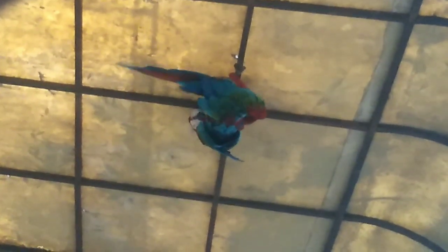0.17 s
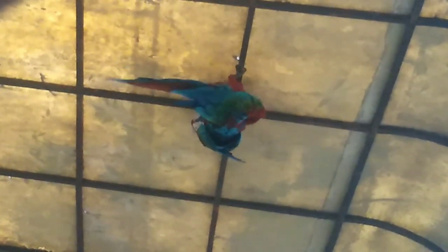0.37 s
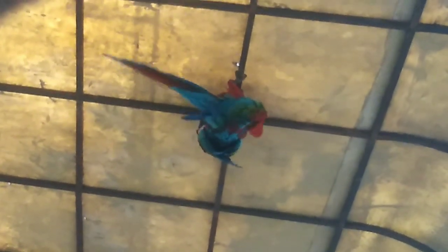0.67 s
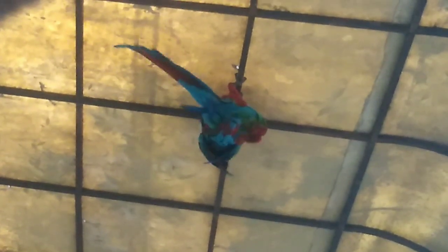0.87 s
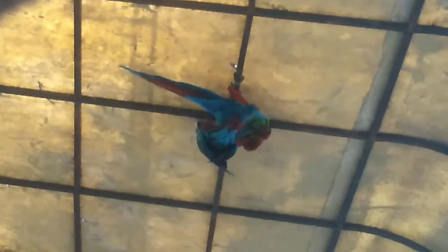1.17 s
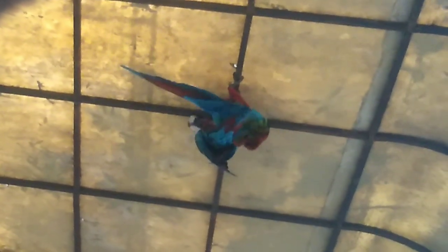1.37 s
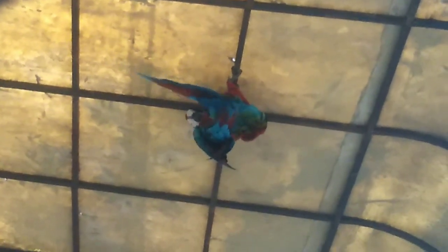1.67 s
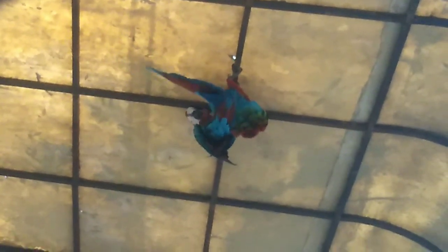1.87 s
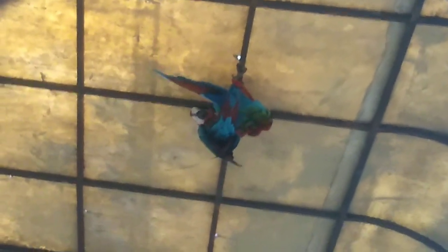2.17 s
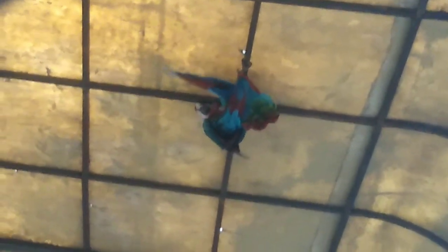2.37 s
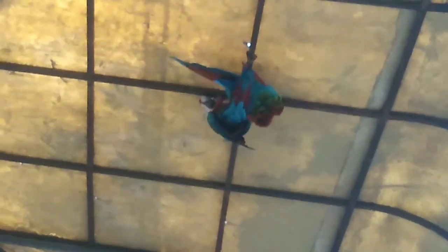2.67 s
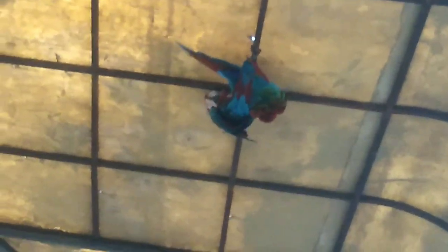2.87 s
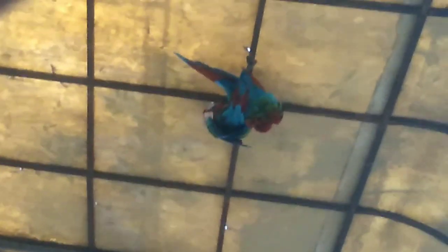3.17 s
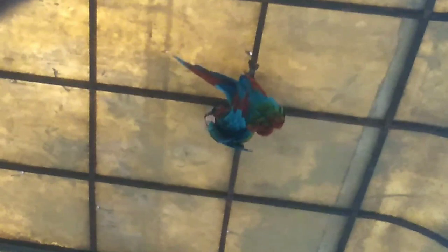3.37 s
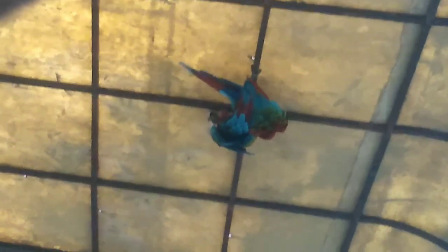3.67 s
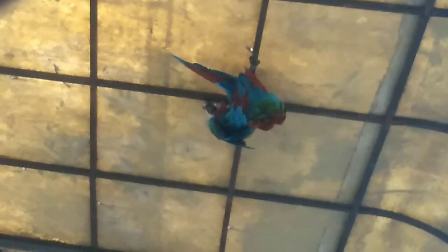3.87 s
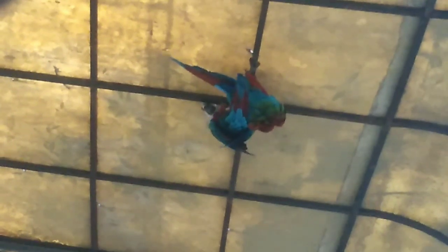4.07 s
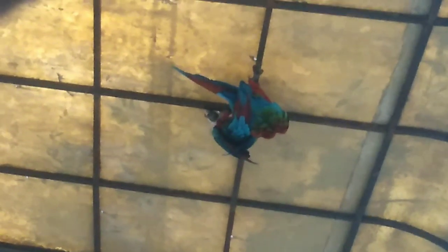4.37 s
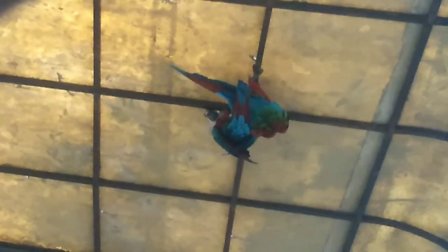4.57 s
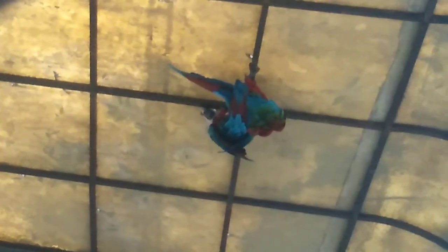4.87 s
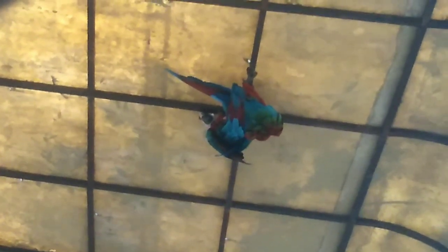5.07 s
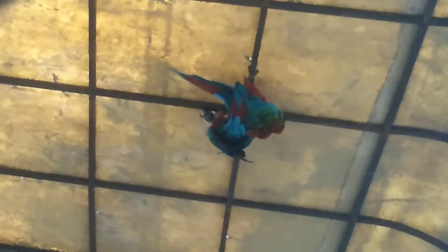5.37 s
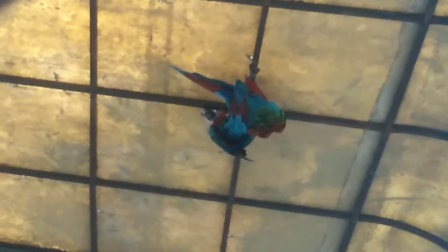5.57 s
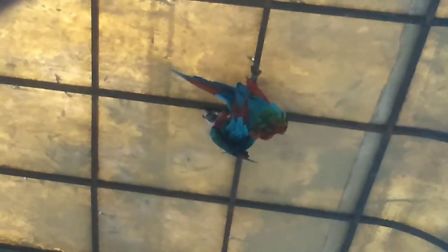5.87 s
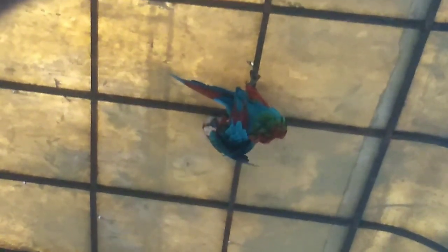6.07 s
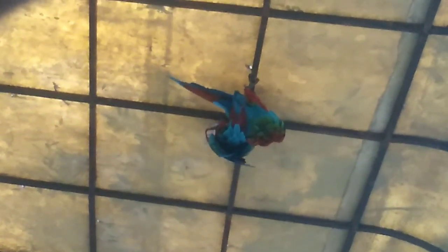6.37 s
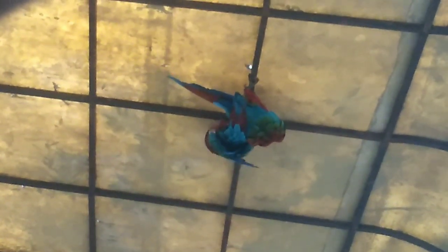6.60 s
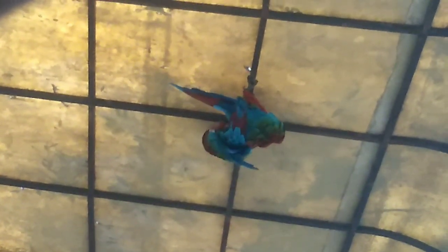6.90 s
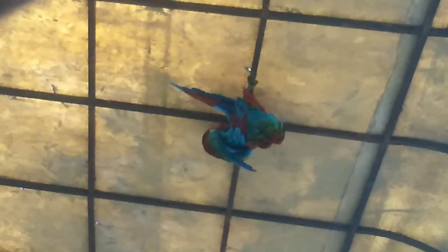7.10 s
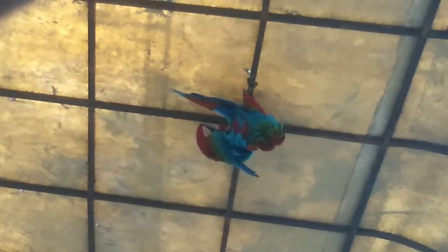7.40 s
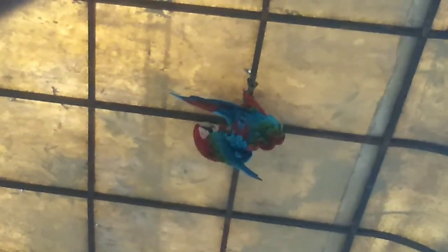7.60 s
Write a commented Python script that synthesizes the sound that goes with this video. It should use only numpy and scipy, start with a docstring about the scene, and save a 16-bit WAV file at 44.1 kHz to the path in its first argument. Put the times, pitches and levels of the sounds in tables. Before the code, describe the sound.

A parrot chatters in quick hoarse bursts while another whistles and rasps nearby; far birds caw and squawk, building to a noisy end.

```python
"""Parrots in an aviary

A near bird chatters in bouts of short buzzy notes, a near macaw whistles, and rasps sound; a claw ticks on the bars.
Far birds squawk, caw and whistle in echoes, their treble to the left, over rumble, a hiss at the left and faint tones.
Voices are pulses and gated noise through throat resonances; whistles are shaken sines; the air is shaped noise."""
import sys
import numpy as np
from scipy import signal
from scipy.fft import rfft, irfft, next_fast_len
from scipy.io import wavfile
from scipy.ndimage import uniform_filter1d, map_coordinates

SR = 44100
rng = np.random.default_rng(int(sys.argv[2]) if len(sys.argv) > 2 else 0)


def unload_wav(signal):
    """Save mono or channel-first audio to the path in sys.argv[1] as 16-bit WAV at rate SR, clipped to [-1, 1]."""
    wavfile.write(
        sys.argv[1],
        SR,
        np.round(np.clip(np.atleast_2d(signal).T, -1, 1) * 32767).astype(np.int16),
    )


N = 341334
T = np.arange(N) / SR
FAR_RISE_S, FAR_SAG_DB = .08, 1  # swell of a far call, and its loss from start to end


def amp(db):
    """Decibels to amplitude."""
    return 10 ** (np.asarray(db) / 20)


def unit(x):
    """Scale to an rms of 1."""
    return x / np.sqrt(np.mean(x ** 2) + 1e-20)


def along(points, hz):
    """Read (Hz, value) points on a log frequency axis."""
    f, v = np.transpose(points)
    return np.interp(np.log(hz + 1), np.log(f + 1), v)


def curves(rows):
    """One value per sample for each column after the time."""
    s, *cols = np.transpose(rows)
    return [np.interp(T, s, c) for c in cols]


def wobble(rate):
    """A smooth random curve, rate knots a second."""
    return map_coordinates(rng.standard_normal(int(N * rate / SR) + 4), [T * rate])


def filtered(x, response):
    """Multiply the spectrum of x by a response of frequency."""
    m = next_fast_len(N + SR // 2)
    return irfft(rfft(x, m) * response(np.fft.rfftfreq(m, 1 / SR)), m)[..., :N]


def calls(rows, rise_s, fall_s, sag_db):
    """Rise, sagging hold and fall of each call; columns after the level are averaged by the gain of the calls."""
    gain = np.zeros(N)
    cols = 1e-9 * np.outer(rows[0][3:], np.ones(N))  # the first row's values hold during silence
    for s, length, db, *rest in rows:
        edges = np.clip(np.minimum((T - s) / rise_s, (s + length - T) / fall_s), 0, 1)
        shape = edges * amp(db - sag_db * np.clip((T - s) / length, 0, 1))
        gain += shape
        cols += np.outer(rest, shape)
    return gain, cols / (gain + 1e-9)


def throat(source, shapes, opening):
    """Cross-fade between the shut and the open set of resonances; each set acts twice, so the valleys stay dark."""
    def ring(modes):
        def response(f):
            total = 0
            for k, (c, w, db) in enumerate(modes):
                band = 1j * f * w / (c * c - f * f + 1j * f * w)
                total = total + (-1) ** k * amp(db) * band
            return total ** 2
        return response

    shut, wide = [unit(filtered(source, ring(modes))) for modes in shapes]
    turn = np.clip(opening, 0, 1) * np.pi / 2
    return np.cos(turn) * shut + np.sin(turn) * wide


def syrinx(hz, rough, jitter, sharp):
    """Membrane pulses at the pitch, mixed with noise let through once a cycle; a rough voice trembles more."""
    share = np.clip(rough, 0, 1)
    waver_db = 4  # each partial wavers on its own
    phase = 2 * np.pi * np.cumsum(hz * (1 + jitter * (0.303 + share) * wobble(120))) / SR
    pulses = np.zeros(N)
    for k in range(1, 15):
        pulses += amp(waver_db * wobble(70)) * np.cos(k * phase) / (1 + (k / 9) ** 4)
    puffs = np.exp(sharp * np.cos(phase)) * rng.standard_normal(N)
    return np.sqrt(1 - share) * unit(pulses) + np.sqrt(share) * unit(puffs)


def tail():
    """A pair of echo tails made of decaying noise; each frequency dies at its own speed."""
    # Decay of the aviary. Each row: frequency in Hz, time to fall by 60 dB in seconds.
    decay = [(300, 0.55), (3000, 0.91), (10000, 0.26)]
    hz, t, z = signal.stft(rng.standard_normal((2, SR // 2)), SR, nperseg=256)
    fading = z * amp(-60 * t / along(decay, hz)[:, None])
    pair = signal.istft(fading, SR, nperseg=256)[1]
    return pair / np.linalg.norm(pair[0])


def rush(spectrum, patchy_db):
    """Stereo noise of rms 1, with random patches of gain, coloured by a spectrum and placed band by band."""
    # Stereo width. Each row: frequency in Hz, left-right likeness from 0 to 1.
    likeness = [(60, 1), (290, 0.8), (630, 0.82), (1370, 0.29), (8000, 1)]
    # Stereo balance. Each row: frequency in Hz, left over right in dB.
    balance = [(60, -0.5), (900, -2.5), (2300, 3), (4250, 17.5), (11000, -0.5)]

    def mid_side(hz):
        turn = np.arccos(np.clip(along(likeness, hz), -1, 1)) / 2
        return amp(along(spectrum, hz)) * np.array([np.cos(turn), np.sin(turn)])

    z = signal.stft(rng.standard_normal((2, N)), nperseg=512)[2]
    across_bands = uniform_filter1d(rng.standard_normal(z.shape[1:]), 5, 0)
    patches = unit(uniform_filter1d(across_bands, 14, 1))
    pair = signal.istft(z * amp(patchy_db * patches), nperseg=512)[1][:, :N]
    mid, side = filtered(pair, mid_side)
    left_right = np.array([mid + side, mid - side])
    return unit(filtered(left_right, lambda hz: amp(np.outer([.5, -.5], along(balance, hz)))))


def moving_air():
    """Rumble of fans and traffic under a wash of air: two shaped noises at slowly changing levels."""
    # Mix of the air. Each row: time in seconds, rumble level in dB, wash level in dB.
    air_levels = [(0, -28, -36.5), (1.5, -31, -38.5), (7.74, -32.5, -39)]
    # Colour of the rumble. Each row: frequency in Hz, relative density in dB per Hz.
    rumble_colour = [(25, -49), (48, -21.5), (75, -8), (140, -4.5), (289, -19.5), (520, -30), (880, -120)]
    # Colour of the wash. Each row: frequency in Hz, relative density in dB per Hz.
    wash_colour = [(150, -25), (250, -7.5), (400, -4), (1310, -7.5), (2160, -12), (3370, -21), (5660, -17),
                   (10800, -37)]
    rumble_db, wash_db = curves(air_levels)
    rumble = amp(rumble_db) * rush(rumble_colour, patchy_db=0.75)
    return rumble + amp(wash_db) * rush(wash_colour, patchy_db=2.0)


def motor():
    """A motor that swells, then fades: a wandering low tone and its octave."""
    # Course of the motor. Each row: time in seconds, level in dB before a slight random waver.
    motor_levels = [(0, -30), (.6, -26), (.85, -30), (1.4, -39)]
    db, = curves(motor_levels)
    phase = 2 * np.pi * np.cumsum(101.5 * (1 + .008 * wobble(3.7))) / SR
    return amp(db + 0.47 * wobble(1.7)) * (np.sin(phase) + amp(-4.0) * np.sin(2 * phase))


def passing_hum():
    """A low hum that passes: a steady sine with a wavering level."""
    hum_hz = 379
    # The hum. Each row: start in seconds, length in seconds, level in dB before the sag and waver.
    hum_rows = [(1.4, 0.645, -41)]
    gain = calls(hum_rows, rise_s=0.081, fall_s=0.086, sag_db=1.8)[0]
    return gain * amp(2.05 * wobble(12.5)) * np.sin(2 * np.pi * hum_hz * T)


def high_tone():
    """A faint flickering high tone at the right: a steady sine of random level."""
    tone_hz = 14000
    tone = amp(-66 + 5 * wobble(16)) * np.sin(2 * np.pi * tone_hz * T)
    return tone * [[0], [1]]


def whistles(strands, dull_db):
    """Tones with three overtones; roughness shakes pitch and strength until the line frays."""
    # Overtone colour. Each row: frequency in Hz, level under the ground tone in dB before the shifts below.
    overtone_colour = [(2600, -15), (3300, -10), (4400, -11), (5000, -20), (6600, -16), (8500, -30),
                       (9050, -10), (9600, -40)]
    order_db, torn_db = 4, 9  # loss from each overtone to the next; overtone gain at full roughness
    out = np.zeros(N)
    shake, flutter = wobble(260), wobble(220)
    flicker_db = [4 * wobble(45) for k in range(3)]  # each overtone comes and goes
    breath = unit(wobble(500))  # turbulence that smears a rough line into a band
    for s, length, first_hz, last_hz, arch_hz, db, rough in strands:
        span = slice(round(s * SR), round((s + length) * SR))
        u = (T[span] - s) / length
        hz = first_hz + (last_hz - first_hz) * u + arch_hz * np.sin(np.pi * u)
        phase = 2 * np.pi * np.cumsum(hz * (1 + 0.0737 * rough * shake[span])) / SR
        tone = np.sin(phase)
        for k in range(2, 5):
            tilt_db = torn_db * rough ** 2 - order_db * (k - 2.5) - dull_db
            overtone_db = along(overtone_colour, k * hz) + tilt_db + flicker_db[k - 2][span]
            tone = tone + amp(overtone_db) * np.sin(k * phase)
        smear = 1 - rough ** 3 + rough ** 2 * breath[span]
        beat = unit(amp(6 * rough * np.tanh(flutter[span])) * smear)
        out[span] += amp(db) * beat * np.abs(np.sin(np.pi * u)) ** 0.3 * tone
    return out


def far_squawks():
    """Hoarse calls: pitch and strength lurch together as the voice cracks, while the beak wavers on its own."""
    # Squawks. Each row: start in seconds, length in seconds, level in dB, beak opening from 0 to 1,
    # pulse rate in Hz; level, opening and rate are centres for random movement.
    squawk_rows = [(4.18, .22, -31.5, .95, 240), (5.42, 0.45, -39, 0.3, 197.6), (6.89, .2, -26.5, .6, 190),
                   (7.03, .35, -26.5, .5, 170), (7.58, .2, -31.5, 0.4, 229)]
    # Throat, beak shut then open. Each row: resonance in Hz, width in Hz, gain in dB, all for one pass of two.
    distant_throat = [
        [(800, 500, -4), (1350, 350, 0), (1650, 300, 0), (4800, 3000, -7)],
        [(1200, 600, -3), (2550, 300, 0), (3100, 400, 0), (5000, 2500, -6.5)],
    ]
    gain, (beak, hz) = calls(squawk_rows, FAR_RISE_S, fall_s=.02, sag_db=FAR_SAG_DB)
    breaks = wobble(22)
    source = syrinx(hz * amp(.8 * breaks), rough=.33, jitter=.03, sharp=1)
    return gain * amp(1.5 * breaks) * throat(source, distant_throat, beak + .25 * wobble(20))


def far_caws():
    """Deep caws of a larger far bird: slow rough pulses through a low throat."""
    # Caws. Each row: start in seconds, length in seconds, level in dB, pulse rate in Hz, before random wander.
    caw_rows = [(2.35, 0.53, -36.5, 118.5), (4.12, 0.43, -40, 129.8), (7.02, 0.37, -27, 140.1),
                (7.46, 0.16, -26, 138.8)]
    # Throat, beak shut then open. Each row: resonance in Hz, width in Hz, gain in dB, all for one pass of two.
    deep_throat = [
        [(742, 370, 1), (1043, 420, 4)],
        [(877, 570, 3), (1250, 2260, -0.5)],
    ]
    gain, (hz,) = calls(caw_rows, FAR_RISE_S, FAR_RISE_S / 2, FAR_SAG_DB)
    source = syrinx(hz * amp(.5 * wobble(22)), rough=.55, jitter=.04, sharp=.7)
    return gain * amp(2 * wobble(25)) * throat(source, deep_throat, .5 + .6 * wobble(12))


def far_birds():
    """Far calls reach the right channel a little late, half lost in echoes; their treble leans left."""
    # Far whistles. Each row: start in seconds, length in seconds, first pitch in Hz, last pitch in Hz,
    # arch in Hz, level in dB, roughness from 0 to 1.
    far_strands = [ (1.235, 0.054, 1823, 1745, 21, -32, 0.18), (1.24, 0.081, 2366, 2394, 24, -43.5, 0.18),
                   (1.43, 0.18, 1750, 1683, 221.5, -39, 0.73), (4.19, .1, 2796, 3370, -6, -39.5, .35),
                   (4.235, 0.069, 2550, 2690, 43, -34, .4), (4.3, 0.14, 780, 727, -1.5, -36, .3),
                   (7.03, 0.13, 2530, 2450, 27.5, -29, 0.66), (7.11, .13, 2824, 2910, 66, -39, 0.41),
                   (7.105, 0.11, 1550, 1471, -6, -19, 0.6)]
    # Balance of the far birds. Each row: frequency in Hz, left over right in dB.
    leaning = [(1300, -4), (2300, 11), (8000, 14)]
    lag_s = 3.6e-4
    voices = far_squawks() + far_caws() + whistles(far_strands, dull_db=7)
    direct = filtered(voices, lambda f: np.array([1 + 0 * f, np.exp(-2j * np.pi * f * lag_s)]))
    echo = signal.fftconvolve(voices[None], tail(), axes=1)[:, :N]
    pair = direct + amp(-6) * echo
    return filtered(pair, lambda f: amp(np.outer([.5, -.5], along(leaning, f))))


def tick():
    """A claw on the bars: a dry click of noise that dies within milliseconds."""
    # The click: start in seconds, level at the start in dB.
    click = (2.925, -28)
    s, db = click
    return amp(db - 60 * np.abs(T - s) / 0.018) * (T > s) * rng.standard_normal(N)


def rasps():
    """Irregular slow slaps of the membranes gate a turbulent stream."""
    # Rasps, from a faint long hoarse cry to loud short ones. Each row: start in seconds, length in seconds,
    # level in dB, beak opening from 0 to 1; level and opening are centres for random movement.
    rasp_rows = [(.93, 0.4, -40, 0.46), (3.985, 0.048, -22, 0.1), (4.555, 0.038, -28.5, 0.3),
                 (6.292, 0.21, -27, 0.62), (6.84, 0.049, -23.5, 0), (7.15, 0.19, -28, 0.5),
                 (7.536, 0.12, -18, 0.57)]
    # Throat, beak shut then open. Each row: resonance in Hz, width in Hz, gain in dB, all for one pass of two.
    large_throat = [
        [(1310, 760, 6.5), (1576, 810, 11), (2310, 1740, 4), (4770, 1700, 0), (6800, 2600, -7)],
        [(1620, 1080, -6.5), (2435, 1400, -1.5), (4440, 680, 2), (6530, 1540, -4.5), (8580, 2800, -6.5)],
    ]
    gain, (beak,) = calls(rasp_rows, rise_s=.014, fall_s=.028, sag_db=4)
    source = syrinx(130 * amp(2.4 * wobble(25)), rough=0.92, jitter=0.098, sharp=0.11)
    ragged = gain * amp(wobble(60))
    return ragged * throat(source, large_throat, beak + .2 * wobble(30))  # the beak is never still


def macaw_whistles():
    """The near macaw whistles in short strands, each a gliding tone."""
    # Near whistles. Each row: start in seconds, length in seconds, first pitch in Hz, last pitch in Hz,
    # arch in Hz, level in dB, roughness from 0 to 1.
    near_strands = [ (3.805, 0.084, 2050, 1940, 196, -30, 0.5), (3.857, 0.038, 1608, 1637, 0, -23, 0.43),
                    (3.897, 0.061, 1672, 1682, 12.5, -15.5, 0.04),
                    (3.958, 0.052, 2100, 1890, 279, -22, 0.44), (4.374, 0.047, 2110, 1900, 230, -27.5, .3),
                    (4.407, 0.11, 1507, 1622, 28, -26.5, 0.14), (4.503, .08, 2024, 1853, 228, -24.5, 0.49),
                    (6.287, 0.19, 1675, 1187, 97.5, -30.5, 0.5), (6.356, .11, 2150, 2510, 11, -27, 0.59),
                    (6.758, .12, 1685, 1237, 11, -26, 0.32), (7.195, .097, 1770, 1350, 60, -18, .58),
                    (7.439, .09, 2985, 3005, 35, -21, .17), (7.518, .045, 2800, 2150, -30, -14, .6),
                    (7.49, .06, 1690, 1560, 20, -29, .5), (7.542, .07, 1540, 1420, -40, -19.5, .7)]
    return whistles(near_strands, dull_db=0.5)


def chatter():
    """Notes swell quickly and fade, pitch arching then sagging; a bout drifts in strength and grows hoarser."""
    # Notes, one list a bout. Each row: start in seconds, pitch in Hz before arch and jitter.
    bout_notes = [
        [(-.015, 507), (.124, 540.3), (.288, 544), (.425, 555.5), (.556, 532.4), (.682, 544.6), (.812, 503),
         (.944, 529), (1.075, 550), (1.202, 557)],
        [(1.984, 495.4), (2.143, 498.7), (2.286, 486), (2.433, 496), (2.581, 496.6)],
        [(3.297, 517.4), (3.455, 554), (3.6, 526), (3.728, 538), (3.853, 532), (3.99, 534), (4.118, 526)],
        [(4.995, 492), (5.159, 502.4), (5.308, 496), (5.456, 496.4)],
        [(6.613, 517), (6.777, 542), (6.919, 548.6)],
        [(7.05, 545), (7.178, 548), (7.305, 545), (7.442, 553)],
    ]
    # Bouts. Each row: note length in seconds, first note in dB, last note in dB,
    # first roughness from 0 to 1, beak opening from 0 to 1; the last two before random scatter.
    bout_settings = [(.046, -29.5, -29, .36, 0.75), (.055, -29, -26.5, 0.31, 0.57),
                     (0.0497, -27.5, -29, .2, 0.47), (.058, -28, -25, 0.26, 0.67),
                     (0.064, -27.5, -24, 0.45, 0.51), (0.045, -27, -28, 0.25, 0.56)]
    # Throat, beak shut then open. Each row: resonance in Hz, width in Hz, gain in dB, all for one pass of two.
    small_throat = [
        [(1602, 480, -7), (2046, 140, -1.5), (2446, 196, -3.5), (4360, 640, -7), (6500, 3100, -8.5)],
        [(1140, 1080, -3), (2736, 610, 4.5), (3310, 620, 3.5), (4346, 780, 2.5), (7800, 1900, -2.5)],
    ]
    hoarsens, cracks = .03, .12  # roughness gained from note to note, and either side of a note's middle
    rough_scatter, beak_scatter = .08, .08
    sag = .035  # share of the pitch lost towards the end of a note
    gain, arch, controls = np.zeros(N), np.ones(N), []
    for notes, (length, first_db, last_db, rough, beak) in zip(bout_notes, bout_settings):
        levels_db = np.linspace(first_db, last_db, len(notes))
        for k, ((s, hz), db) in enumerate(zip(notes, levels_db)):
            span = slice(max(round(s * SR), 0), round((s + length) * SR))
            u = np.clip((T[span] - s) / length, 0, 1)
            gain[span] += amp(db) * np.abs(np.sin(np.pi * u ** 0.9)) ** 0.75
            arch[span] += .018 * (np.sin(np.pi * u ** 0.55) - .8) - sag * (u ** 4 - .15)
            hoarse = min(rough + hoarsens * k, .65) + rough_scatter * rng.standard_normal()
            gape = beak + beak_scatter * rng.standard_normal()
            controls.append((s, hz, hoarse - cracks, gape))
            controls.append((s + length, hz, hoarse + cracks, gape))
    hz, rough, beak = curves(controls)
    source = syrinx(hz * arch, rough, jitter=.03, sharp=1)
    return gain * throat(source, small_throat, beak)


def scene():
    """Chatter, macaw, rasps and their echo straight ahead; a high tone at the right, a band limit on everything else."""
    band_limit_hz = 10800
    air = moving_air() + motor() + passing_hum()
    far = far_birds()
    large = macaw_whistles() + rasps() + tick()
    small = chatter()
    echoed = amp(-11) * small + amp(-17) * large  # the macaw is nearer, so drier
    near = small + large + signal.fftconvolve(echoed, tail()[0])[:N]
    return filtered(near + far + air, lambda hz: hz < band_limit_hz) + high_tone()


def record(dry):
    """The recorder keeps nothing above its band limit."""
    top_hz = 14960
    return filtered(dry, lambda hz: hz < top_hz)


dry = scene()
out = record(dry)
unload_wav(out)
```